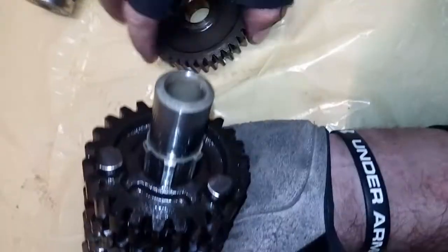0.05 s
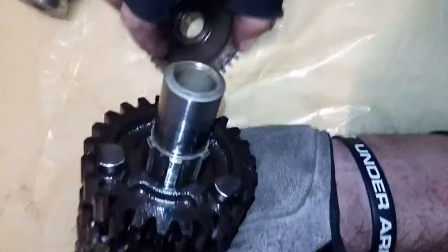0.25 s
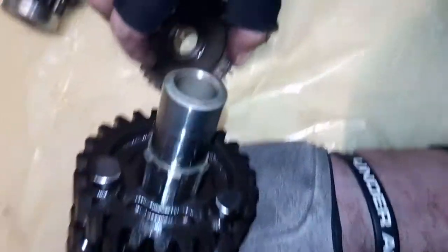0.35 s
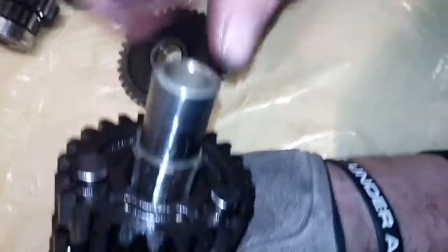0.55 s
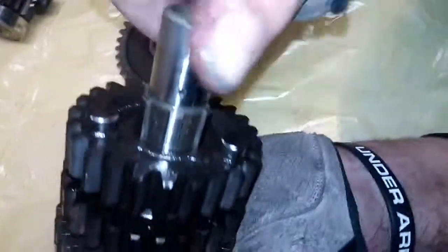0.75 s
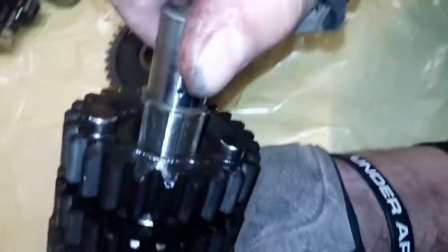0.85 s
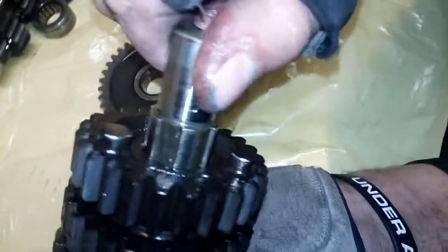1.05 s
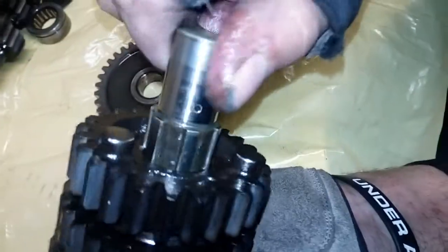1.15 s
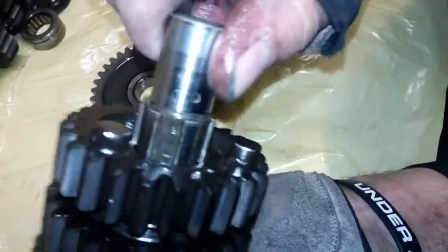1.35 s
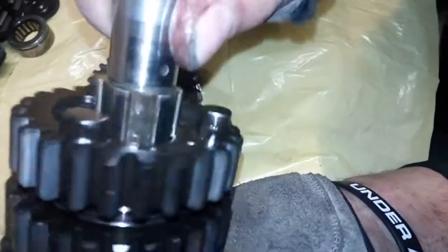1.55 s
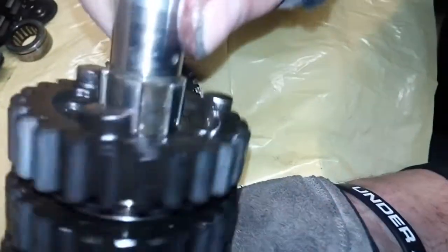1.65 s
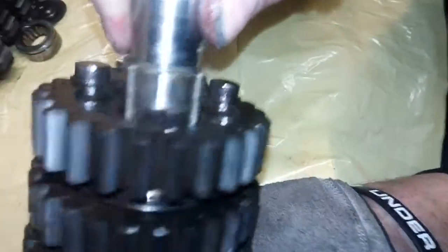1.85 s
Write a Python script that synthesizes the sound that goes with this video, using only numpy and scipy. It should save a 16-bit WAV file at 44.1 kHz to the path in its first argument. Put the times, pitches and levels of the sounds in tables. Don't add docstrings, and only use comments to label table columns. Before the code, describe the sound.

A heavy steel gear knocks down on a sheet-covered bench, then plastic crackles and gloves rub

```python
import sys
import numpy as np
from scipy import signal
from scipy.fft import rfft, irfft, next_fast_len
from scipy.io import wavfile
from scipy.ndimage import uniform_filter1d

SR = 44100
rng = np.random.default_rng(int(sys.argv[2]) if len(sys.argv) > 2 else 0)


def to_wav(s):
    ch = np.atleast_2d(s).T
    pcm = np.round(np.clip(ch, -1, 1) * 32767)
    wavfile.write(sys.argv[1], SR, pcm.astype(np.int16))


def ratio(d):
    e = np.asarray(d, float) / 20
    return 10 ** e


N = 83790

# start_s, ring_db, boom_db, crack_db
LANDINGS = [
    (.2050, -5.5, -4, -17.5),
    (.243, -17, -13, -47),
    (.3022, -26.5, -24, -23.5),
    (.3050, -8, -12.5, -15),
    (.414, -40, -60.5, -57),
]
# pitch_hz, level_db, t60_s
EDGE_MODES = [(147, -11, 0.45), (274.2, -7.5, 0.5), (296.3, -12, 0.17), (415, 11, 0.037),
              (547, -17.5, 0.47), (713.3, -5.5, 0.0093), (865, -4, 0.14), (990, -1, 0.091),
              (1139, -12, 0.11), (1459, -12, 0.41), (1405, -1, 0.027)]
FLAT_MODES = [(118, 8.5, 0.14), (137.8, -3, 0.24), (210.8, 4, 0.2), (273.2, -7, 0.71), (333.8, -7, 0.43),
              (522, -2, 0.14), (577, -18.5, 0.34), (900, -10.5, 0.18), (1171, -1, 0.056), (1540, -7, 0.065)]
EDGE_COUNT = 2
LONGEST_RING_S, SWELL_HZ = .36, 750
# start_s, change_db
CHOKES = [
    (.262, -5),
    (.378, -5),
]
# freq_hz, density_db_per_hz
BOOM_COLOUR = [(18, -64), (30, -40.5), (123, 1.5), (190, -15), (284, -3.5), (369, -13), (1470, -16),
               (5450, -50.5), (15500, -90.5)]
# freq_hz, t60_s
BOOM_T60 = [(60, 0.49), (250, 0.5), (1000, 0.33), (2500, 0.15), (6000, 0.25), (12000, 0.11)]
# freq_hz, likeness (0 to 1)
BOOM_ALIKE = [(100, 0.86), (300, 1), (700, .6), (1500, 0.1)]
# freq_hz, density_db_per_hz
CRACK_COLOUR = [(180, -32.5), (300, -6), (1380, -9), (1890, -7.5), (6240, -23), (14100, -59.5),
                (15800, -81)]
BENCH_ATTACK_S, BOOM_ATTACK_S, CRACK_ATTACK_S = .0004, .001, .0003
# freq_hz, extra_left_over_right_db
KNOCK_PAN = [(100, -1), (300, 3), (700, -1), (3000, 0), (10000, 6)]
KNOCK_PAN_DB = -2.5

# start_s, tick_db, ring_db
STRIKES = [
    (.2052, -15, -63),
    (.3024, -32, -76),
    (.3058, -21, -61),
    (.508, -80, -76),
]
# pitch_hz, level_db, t60_s
STEEL_MODES = [(6900, -6, .1), (8600, -3, .2), (9800, -5, .15), (11050, 0, .16), (12600, -6, .1)]
# freq_hz, density_db_per_hz
TICK_COLOUR = [(500, -14), (1300, 0), (3200, -10), (6000, -16), (9000, -35), (13500, -33), (15500, -41),
               (16400, -56)]
# start_s (centre), level_db, pitch_hz, half_width_s
ROCKS = [
    (.27, -41, 27, .055),
    (.251, -11, 277, .014),
    (.334, -19, 216, .014),
    (.358, -16, 288, .019),
    (.47, -38, 310, .03),
    (.52, -45, 225, .04),
]

# start_s, pitch_hz, level_db, t60_s
CHIME = (.138, 4720, -55, .5)
# start_s, peak_db
TAPS = [
    (1.715, -43.5),
    (1.859, -40),
    (1.8644, -23.5),
    (1.8752, -39),
    (1.879, -43.5),
]
# pitch_hz, level_db, t60_s
TAP_MODES = [(1150, 0, .007), (2000, 0, .007), (3000, -3, .008)]

# start_s, peak_db, pitch_hz, t60_ms
SNAPS = [(0.1476, -42, 3330, 12), (0.2604, -44, 8200, 6.9), (.288, -41, 5070, 6.5),
         (0.292, -35.5, 5600, 1.7), (.392, -51.5, 5700, 7.8), (0.533, -56.5, 5200, 3.6),
         (0.6072, -47, 5070, 4.3), (0.6557, -43, 4930, 4.4), (.6672, -49, 6500, 6),
         (0.6664, -40, 9600, 6.5), (0.685, -41, 5500, 9.8), (0.7106, -33.5, 4070, 6.2),
         (.7106, -34.5, 7000, 3.3), (0.7285, -53, 2500, 8), (0.732, -36, 4740, 12), (0.7705, -39, 1450, 15),
         (0.775, -37, 5500, 12), (0.781, -40.5, 6250, 5.8), (.790, -41, 5600, 5.5), (0.802, -45, 4460, 6),
         (0.8036, -30.5, 3300, 8.5), (.8044, -33, 5240, 3.9), (.820, -49, 2980, 5.6),
         (.834, -40, 2140, 7.2), (0.887, -46.5, 4000, 6.6), (1.039, -53, 4330, 5.7), (1.137, -41, 2594, 8),
         (1.169, -55, 2200, 8), (1.203, -61, 1800, 5.4), (1.2592, -47.5, 1716, 7.9),
         (1.274, -46.5, 1980, 10), (1.2934, -43, 4300, 7), (1.3008, -35.5, 5950, 5.5),
         (1.303, -52, 4300, 6), (1.311, -35.5, 2350, 5.5), (1.315, -38, 6200, 8.8),
         (1.3234, -33, 5300, 2.6), (1.3236, -32.5, 2450, 4.6), (1.3454, -37.5, 4800, 5.5),
         (1.3572, -38, 1870, 7.2), (1.3571, -37, 3940, 4.5), (1.3793, -39.5, 1650, 9),
         (1.3806, -36, 2840, 7.4), (1.391, -41.5, 1860, 10), (1.4218, -39, 5460, 15), (1.429, -47, 4140, 6),
         (1.4372, -41, 3470, 7), (1.5707, -57, 3900, 7), (1.587, -47, 4200, 3.3), (1.6858, -64, 2760, 6)]
# freq_hz, level_db
SHEET_COLOUR = [(300, -23), (1200, -9), (2500, -2), (6500, -7.5), (8200, -22), (14000, -33.5),
                (16000, -65.5)]
# start_s, pressure_db, pan_db
RUB = [(0, -97.5, 49), (.19, -58.5, -16), (.38, -67.5, -1.5), (.58, -61, 0.5), (.68, -52, -1),
       (.81, -47.5, -2.5), (.86, -57, 1.5), (.97, -58, 3.5), (1.14, -58, 1), (1.27, -63, -1),
       (1.30, -49.5, -5), (1.36, -58, 0), (1.44, -57, -3.5), (1.5, -64.5, -2.5), (1.67, -71.5, -5),
       (1.72, -69.5, -11.5), (1.85, -68, -7.5), (1.9, -56, -2.5)]
# freq_hz, density_db_per_hz
CLOTH_COLOUR = [(180, -30), (300, 2), (1000, -6.5), (6800, -13.5), (8200, -30.5), (15500, -47)]
# pitch_hz, width_hz, level_db
HOLLOWS = [(1890, 520, -10), (2520, 430, 1), (4070, 560, 1)]

# start_s (centre), peak_db, pitch_hz
BUMPS = [(0.847, -36, 114), (0.906, -45, 70), (0.991, -33, 102.6), (1.028, -49, 59.3), (1.121, -39, 90),
         (1.2, -41.5, 72), (1.232, -44, 87.5), (1.304, -46.5, 99), (1.361, -39, 90), (1.402, -39.5, 104),
         (1.483, -38, 116), (1.525, -46.5, 90), (1.566, -48, 71.3), (1.599, -48.5, 106.2),
         (1.631, -48.5, 104.4)]
# start_s (centre), peak_db, pitch_hz
NUDGES = [
    (.128, -43, 131),
    (.155, -49, 108),
    (.421, -20.5, 257),
    (.645, -39, 275),
    (1.8, -43, 128.7),
]

# freq_hz, density_db_per_hz
HUM_COLOUR = [(15, -55), (25, -24.5), (53, -14.5), (71, -22.5), (143, -4), (182, -14.5), (240, -6.5),
              (484, -32), (1500, -32), (1950, -59), (3300, -120)]
# start_s, level_db
HUM_LEVEL = [(0, -65.5), (.5, -56.5), (.7, -52.5), (.9, -56), (1.35, -58.5), (1.6, -72), (1.72, -59.5)]
# freq_hz, density_db_per_hz
AIR_COLOUR = [(350, -46), (600, -11), (1290, -23.5), (1990, -3.5), (2610, -20), (5440, -17), (8180, -39),
              (14300, -33), (15300, -52.5)]
# pitch_hz, level_db
MAINS = [(250, -76), (300.5, -67), (401, -76), (499, -79)]


def unit(x):
    return x / np.sqrt(np.mean(x ** 2) + 1e-20)


def along(points, hz):
    f, v = np.transpose(points)
    return np.interp(np.log(hz + 1), np.log(f + 1), v)


def curves(rows):
    s, *cols = np.transpose(rows)
    return [np.interp(np.arange(N) / SR, s, c) for c in cols]


def filtered(x, response):
    n = x.shape[-1]
    m = next_fast_len(n + 4096)
    return irfft(rfft(x, m) * response(np.fft.rfftfreq(m, 1 / SR)), m)[..., :n]


def sides(pan_db):
    return ratio(np.array([pan_db / 2, -pan_db / 2]))


def pair(noise, spectrum, alike):
    def mid_side(hz):
        turn = np.arccos(np.clip(along(alike, hz), -1, 1)) / 2
        return ratio(along(spectrum, hz)) * [np.cos(turn), np.sin(turn)]
    mid, side = filtered(noise, mid_side)
    return unit(np.array([mid + side, mid - side]))


def patchy(noise, patchy_db):
    z = signal.stft(noise, nperseg=512)[2]
    field = rng.standard_normal(z.shape[1:])
    field = uniform_filter1d(field, size=5, axis=0)
    field = uniform_filter1d(field, size=6, axis=1)
    return signal.istft(z * ratio(patchy_db * unit(field)), nperseg=512)[1][:, :N]


def add(out, s, sound):
    part = out[:, round(s * SR):][:, :sound.shape[-1]]
    part += sound[..., :part.shape[-1]]


def ring(modes, t, attack_s):
    total = 0
    for hz, db, t60 in modes:
        phase = rng.normal(0, 1, (2, 1)) * min(hz / 900, 2)
        swell = 1 - np.exp(-t / (attack_s * (1 + (SWELL_HZ / hz) ** 4)))
        fall = ratio(db - 60 * t / min(t60, LONGEST_RING_S))
        total = total + fall * np.sin(2 * np.pi * hz * t + phase) * swell
    return total


def dense_boom(t):
    noise = pair(rng.standard_normal((2, len(t))), BOOM_COLOUR, BOOM_ALIKE)
    hz, at, z = signal.stft(noise, SR, nperseg=256)
    hz = hz[:, None]
    swell_s = BENCH_ATTACK_S * (1 + (SWELL_HZ / (hz + 100)) ** 4)
    swell = 1 - np.exp(-(at + BOOM_ATTACK_S) / swell_s)
    fall = ratio(-60 * at / along(BOOM_T60, hz))
    return signal.istft(z * swell * fall, SR, nperseg=256)[1][:, :len(t)]


def landings():
    out, t = np.zeros((2, N)), np.arange(SR // 2) / SR
    for k, (s, ring_db, boom_db, crack_db) in enumerate(LANDINGS):
        boom = dense_boom(t) * (1 - np.exp(-(t / BOOM_ATTACK_S) ** 2))
        crack = pair(rng.standard_normal((2, len(t))), CRACK_COLOUR, BOOM_ALIKE)
        crack = crack * ratio(-60 * t / 0.013) * (1 - np.exp(-t / CRACK_ATTACK_S))
        bench = ring(EDGE_MODES if k < EDGE_COUNT else FLAT_MODES, t, BENCH_ATTACK_S)
        choke_db = np.zeros(len(t))
        for when, db in CHOKES:
            if when > s:
                choke_db += db / (1 + np.exp(-np.clip((s + t - when) / .004, -50, 50)))
        body = ratio(ring_db) * bench + ratio(boom_db) * boom
        add(out, s, body * ratio(choke_db) + ratio(crack_db) * crack)
    return out


def steel_strikes():
    out, t = np.zeros((2, N)), np.arange(SR // 2) / SR
    for s, tick_db, ring_db in STRIKES:
        fall = ratio(-60 * t / .014) + ratio(-19 - 60 * t / .16)
        fall = fall * (1 - np.exp(-t / CRACK_ATTACK_S))
        tick = pair(rng.standard_normal((2, len(t))), TICK_COLOUR, BOOM_ALIKE) * fall
        strike = ratio(tick_db) * tick + ratio(ring_db) * ring(STEEL_MODES, t, CRACK_ATTACK_S)
        add(out, s, strike * sides(-9)[:, None])
    return out


def rocking():
    out = np.zeros((2, N))
    for s, db, hz, half_width_s in ROCKS:
        u = np.arange(N) / SR - s
        swell = np.exp(-(u / half_width_s) ** 2)
        out += ratio(db) * swell * np.sin(2 * np.pi * hz * u) * sides(-1.3)[:, None]
    return out


def chime():
    out, t = np.zeros((2, N)), np.arange(SR // 2) / SR
    s, hz, db, t60 = CHIME
    drift = np.cumsum(rng.normal(0, 0.0083, (2, len(t))), axis=1)
    fall = ratio(db - 60 * t / t60) * (1 - np.exp(-t / 0.012))
    add(out, s, fall * np.sin(2 * np.pi * hz * t + drift))
    return out


def gear_contacts():
    out, t = np.zeros((2, N)), np.arange(SR // 2) / SR
    pan = sides(-12.5 - KNOCK_PAN_DB)[:, None]
    for s, db in TAPS:
        knock = filtered(ring(TAP_MODES, t, attack_s=.0005), lambda hz: 1 / (1 + (hz / 4500) ** 6))
        add(out, s, ratio(db - 4.0) * knock * pan)
    return out


def bench_to_ports(sound):
    left_lag_s = .00027

    def path(hz):
        lag = np.exp(-1j * np.pi * hz * left_lag_s * np.array([[1], [-1]]))
        low_cut = (1j * hz / (90 + 1j * hz)) ** 2
        return lag * sides(KNOCK_PAN_DB + along(KNOCK_PAN, hz)) * low_cut
    return filtered(sound, path)


def sheet_crackles():
    out, t, pan_db = np.zeros((2, N)), np.arange(2048) / SR, curves(RUB)[1]
    lead = 128
    for s, db, hz, t60_ms in SNAPS:
        fall = ratio(-60 * t / t60_ms * 1e3) + ratio(-22 - 60 * t / 0.057)
        burst = rng.standard_normal((2, len(t))) * fall * (1 - np.exp(-t / .0003))
        burst = np.pad(burst, ((0, 0), (lead, 0)))

        def colour(f):
            damping = 1j * f * .7 * hz
            peak = (damping / (hz * hz - f * f + damping)) ** 2
            return (peak + ratio(-8)) * ratio(along(SHEET_COLOUR, f))
        burst = filtered(burst, colour)
        burst = burst / np.abs(burst).max(1, keepdims=True)
        pan = sides(pan_db[round(s * SR)] - 3)[:, None]
        add(out, s - lead / SR, ratio(db + 2) * burst * pan)
    return out


def glove_rub():
    press_db, pan_db = curves(RUB)
    grit_per_s, grit_spread_db, grit_db = 1800, 2, -0.5
    sizes = ratio(grit_spread_db * rng.exponential(size=N)) * (rng.random(N) < grit_per_s / SR)
    grain = ratio(-60 * np.arange(200) / SR / 0.002)
    gate = unit(np.convolve(sizes, grain)[:N])
    hiss = patchy(rng.standard_normal((2, N)), patchy_db=3.0)
    hiss = hiss + ratio(grit_db) * gate * rng.standard_normal((2, N))

    def cavities(f):
        return 1 + sum(ratio(db) / (1 + ((f - hz) / w * 2) ** 2) for hz, w, db in HOLLOWS)
    cloth = pair(filtered(hiss, cavities), CLOTH_COLOUR, [(300, .7), (1000, .1), (8000, 0.027)])
    return ratio(press_db) * sides(pan_db) * cloth


def bumps():
    out, t = np.zeros((2, N)), np.arange(N) / SR
    cycles, scuff_db, scuff_s = 1.09, -20, 0.043
    scuff = filtered(rng.standard_normal(N), lambda f: f / (1 + (f / 90) ** 2) / (1 + (f / 400) ** 4))
    scuff = unit(scuff)
    for rows, pan_db in (BUMPS, 19), (NUDGES, -3.5):
        pan = (2 * sides(pan_db) / sides(pan_db).sum())[:, None]
        for s, db, hz in rows:
            u = (t - s) * hz
            bell = np.exp(-(u / (0.69 * cycles)) ** 2)
            push = bell * np.cos(2 * np.pi * u + rng.uniform(0, 2 * np.pi))
            push = push + ratio(scuff_db) * scuff * np.exp(-((t - s) / scuff_s) ** 2)
            out += ratio(db + 1) * push * pan
    return out


def room():
    hum_db, = curves(HUM_LEVEL)
    hum = patchy(rng.standard_normal((2, N)), patchy_db=3)
    hum = pair(hum, HUM_COLOUR, [(60, 0.69), (200, 0.38), (1000, 0.23)])
    air = patchy(rng.standard_normal((2, N)), patchy_db=0.5)
    air = pair(air, AIR_COLOUR, [(600, 0.5), (4000, .05)])
    air_db = -65.5 - 6.5 * (np.arange(N) > .25 * SR)
    return ratio(hum_db + 2.5) * hum + ratio(air_db) * air


def mains():
    out, t = np.zeros(N), np.arange(N) / SR
    for hz, db in MAINS:
        drift = np.cumsum(rng.normal(0, .006, N))
        out += ratio(db + 3) * np.sin(2 * np.pi * hz * t + drift)
    return out


def scene():
    on_bench = bench_to_ports(landings() + chime() + gear_contacts())
    hands = sheet_crackles() + glove_rub() + bumps()
    background = room()
    gear = on_bench + steel_strikes() + rocking()
    return gear + hands + background + mains()


def band_limit(x):
    return signal.sosfilt(signal.butter(12, 16490, fs=SR, output="sos"), x)


def record(dry):
    clip_top, clip_hard = 1.0, 8
    clipped = dry / (1 + np.abs(dry / clip_top) ** clip_hard) ** (1 / clip_hard)
    mix = filtered(clipped, lambda hz: hz < 16450)
    return band_limit(mix)


dry = scene()
out = record(dry)
to_wav(out)
```